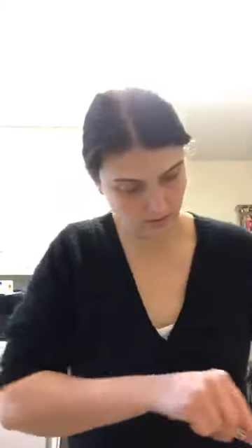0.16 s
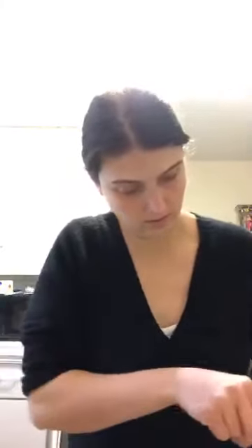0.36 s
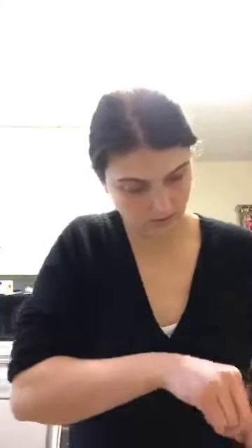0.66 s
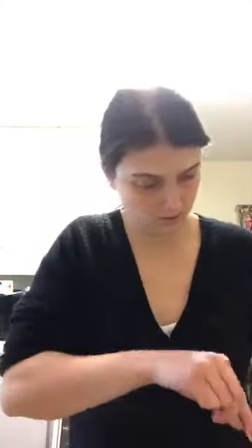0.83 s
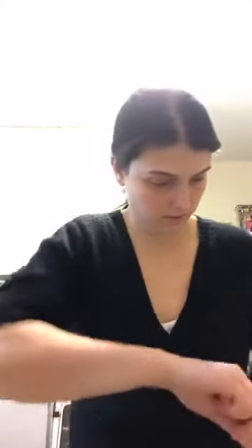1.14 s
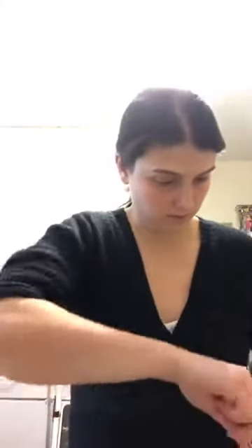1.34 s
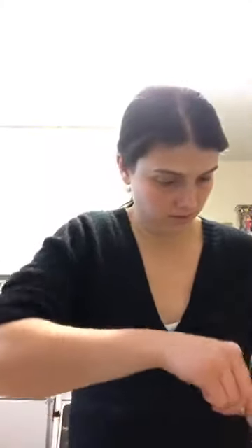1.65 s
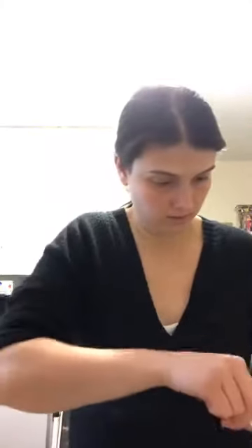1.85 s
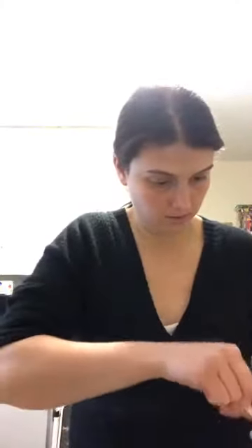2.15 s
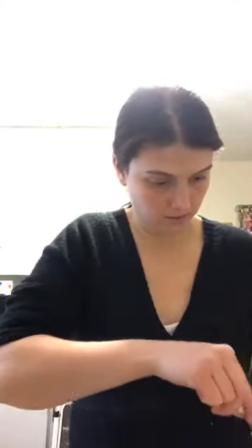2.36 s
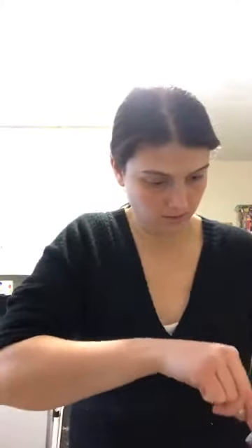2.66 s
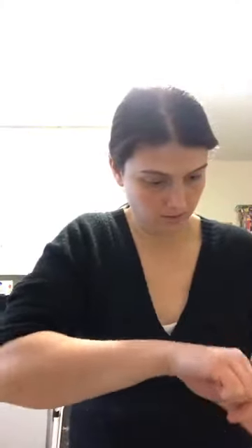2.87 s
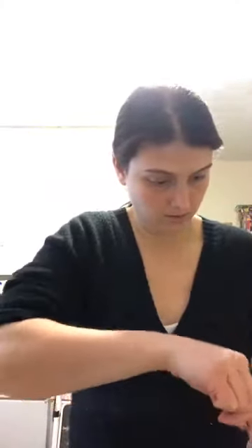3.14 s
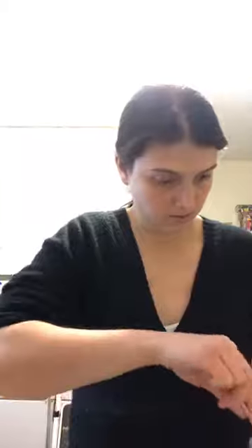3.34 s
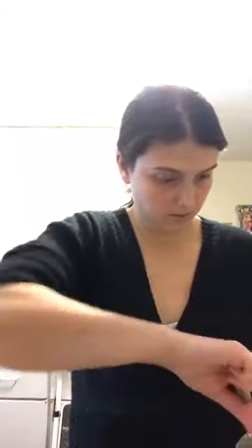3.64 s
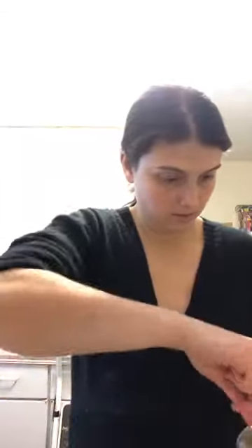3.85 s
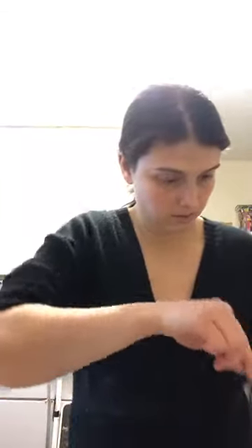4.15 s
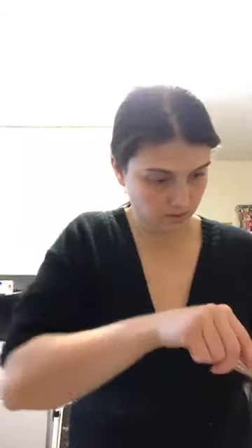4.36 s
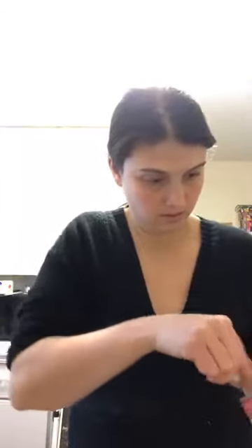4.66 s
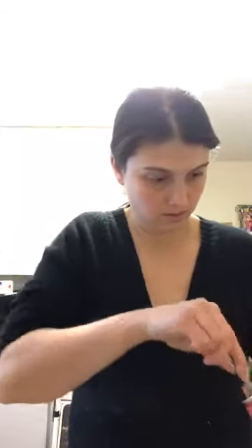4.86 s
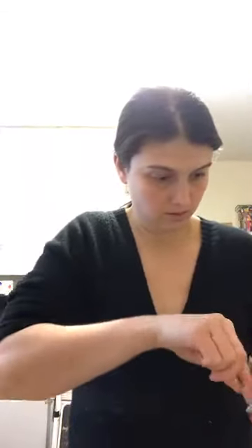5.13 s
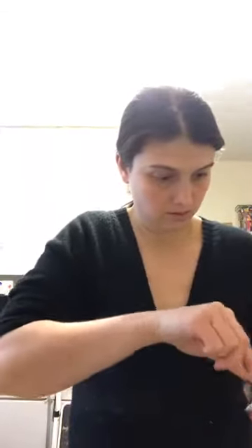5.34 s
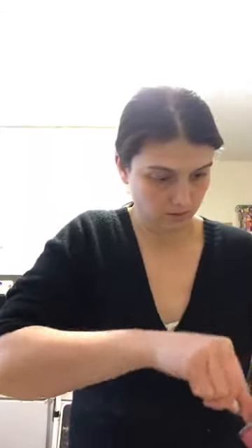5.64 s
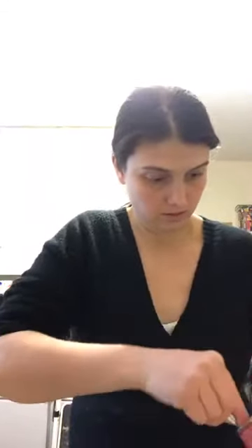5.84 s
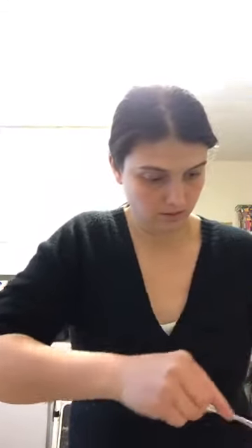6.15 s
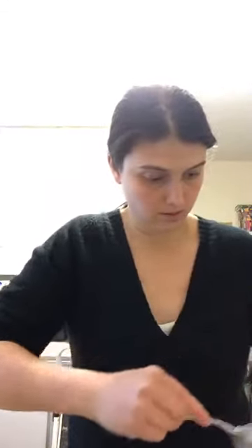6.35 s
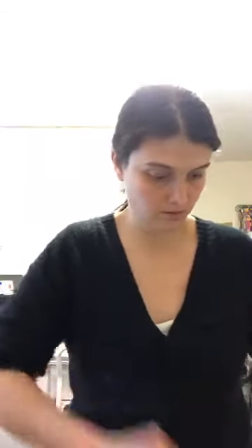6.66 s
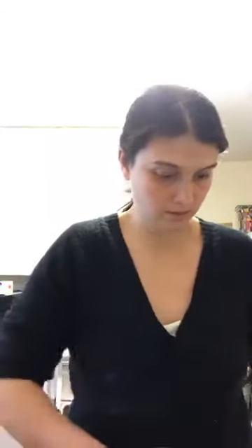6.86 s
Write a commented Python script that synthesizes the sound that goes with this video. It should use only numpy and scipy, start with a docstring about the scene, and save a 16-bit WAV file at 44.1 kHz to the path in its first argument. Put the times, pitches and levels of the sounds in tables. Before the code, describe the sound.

A metal spoon knocks and scrapes inside a tin can in short irregular bursts over faint kitchen hum, ending with a dull counter thud.

```python
"""In a small kitchen, a metal spoon works thick soup out of a tin can into a bowl.
Blows clink on the can wall: a chattering contact excites metal rings, and decaying sines give wall and hollow air.
Scrapes are stick-slip pulses and grit noise driving the resonances of can and spoon.
Mains hum and filtered room noise lie underneath; at the end something is set down on the counter with a thud.
Reflections and a short diffuse tail place the blows, scrapes and thud in the room."""
import sys
import numpy as np
from scipy import signal
from scipy.fft import rfft, irfft
from scipy.io import wavfile

SR = 44100
rng = np.random.default_rng(int(sys.argv[2]) if len(sys.argv) > 2 else 0)


def waveform_to_disk(signal):
    """Save audio, clipped to [-1, 1], as 16-bit WAV at the path in sys.argv[1]."""
    frames = np.transpose(np.atleast_2d(signal))
    scaled = np.clip(frames, -1, 1) * 32767
    samples = np.round(scaled).astype(np.int16)
    wavfile.write(sys.argv[1], SR, samples)


N = 308700  # 7 s

# thin ringing of the spoon: (frequency [Hz], t60 [s], level [dB])
SPOON_PARTIALS = [(5195, 0.033, -13), (5705, 0.052, -13.5), (6860, 0.022, -6), (7560, .04, -28),
                  (8780, 0.016, -1.5), (9140, 0.011, -3), (11400, .03, -16), (13800, 0.035, -13.5),
                  (14065, 0.17, -34)]
# pitch of the can wall when nothing presses it
WALL_REST_HZ = 1140


def undb(db):
    """Decibels to gain."""
    return 10 ** (np.asarray(db) / 20)


def unit(x, size=None):
    """Scale to rms 1 over the first samples, or over all."""
    return x / np.sqrt(np.mean(x[:size] ** 2) + 1e-20)


def fade(t, t60):
    """Exponential decay by 60 dB in t60 seconds."""
    return np.exp(-np.log(1000) * t / t60)


def add(out, s, x):
    """Mix a sound in at time s."""
    i = int(s * SR)
    out[i:i + len(x)] += x[:len(out) - i]


def wander(size, rate):
    """Random motion of spread near 1, with straight lines between `rate` random knots per second."""
    knots = np.arange(size) * rate / SR
    heights = rng.standard_normal(int(knots[-1]) + 2)
    return np.interp(knots, np.arange(len(heights)), heights)


def blend(places, position):
    """Levels between the neighbouring rows of a table, for a position from 0 to 1."""
    rows = np.linspace(0, 1, len(places))
    return [np.interp(position, rows, db) for db in np.transpose(places)]


def colour(x, points):
    """Causal minimum-phase filter with the given (frequency [Hz], level [dB]) curve."""
    hz, db = np.transpose(points)
    log_hz = np.log(np.fft.rfftfreq(4096, 1 / SR) + 1)
    gain = undb(np.interp(log_hz, np.log(hz), db))
    # folding the cepstrum onto positive time makes the response causal
    cepstrum = irfft(np.log(gain))
    cepstrum[1:len(gain) - 1] *= 2
    cepstrum[len(gain):] = 0
    response = irfft(np.exp(rfft(cepstrum)))
    return signal.fftconvolve(x, response)[:len(x)]


def mode(x, hz, width_hz):
    """A resonance driven by x; its frequency may move."""
    turn = np.exp(2j * np.pi * np.cumsum(hz * np.ones(len(x))) / SR)
    envelope = signal.lfilter([1], [1, -np.exp(-np.pi * width_hz / SR)], x / turn)
    return (turn * envelope).imag


def background():
    """An appliance hums, wavering a little, over soft room noise."""
    # mains hum, about which each level wavers: (frequency [Hz], level [dB])
    hum_partials = [(60, -64.5), (120, -56.5), (181, -58), (241, -64.5), (361, -66)]
    # colour of the room noise: (frequency [Hz], relative level [dB])
    room_curve = [(15, -56.5), (25, -29), (46, -8.5), (180, -3), (206, -14), (229, -8), (326, -16),
                  (363, -14.5), (439, -16.5), (677, -20.5), (734, -19), (988, -18.5), (1650, -29.5),
                  (2400, -29.5), (3100, -35), (4100, -35.5), (8140, -41), (16000, -48)]
    room_db = -53
    t = np.arange(N) / SR
    hum = np.zeros(N)
    for hz, db in hum_partials:
        level = undb(db + 2.3 * wander(N, 2.7))
        hum += level * unit(np.sin(2 * np.pi * hz * t + .5 * wander(N, 10)))
    room = unit(colour(rng.standard_normal(N), room_curve))
    return hum + undb(room_db + 0.29 * wander(N, 4.5)) * room


def kitchen(x):
    """Counter and cupboards reflect at once; a short diffuse tail follows, drawn anew for each sound."""
    # early reflections, each delay varied by up to 12 %: (delay [s], level [dB])
    echoes = [(.0022, -15.5), (.0055, -14), (.0205, -25.5), (.039, -30.5)]
    # diffuse reverberation: (band centre [Hz], level [dB], t60 [s])
    reverb_bands = [(180, -4, 0.47), (396, -3.5, 0.15), (724, -10.5, 0.33), (1290, -6, 0.18),
                    (2820, -10, 0.27), (5500, -10.5, 0.26), (11500, -12.5, 0.19)]
    t = np.arange(2 ** 14) / SR
    centres, db, t60 = np.transpose(reverb_bands)
    log_hz = np.log(np.fft.rfftfreq(len(t), 1 / SR) + 1)
    bands = np.array([np.interp(log_hz, np.log(centres), band) for band in np.eye(len(centres))])
    tails = fade(t, t60[:, None]) * np.clip((t - .004) / 0.0029, 0, 1)
    tails *= undb(db[:, None]) / np.linalg.norm(tails, axis=1, keepdims=True)
    noise = irfft(rfft(rng.standard_normal(len(t))) * bands)
    response = np.sum(noise * tails, axis=0)
    response[0] += 1  # direct sound
    for delay, echo_db in echoes:
        add(response, delay * rng.uniform(.88, 1.12), undb([echo_db]))
    return signal.fftconvolve(x, response)


def thud(lead_s=0.00347):
    """An edge touches the counter first, then the full weight lands and its modes ring."""
    # modes of the counter: (frequency [Hz], t60 [s], relative level [dB])
    counter_modes = [(115, 0.15, -9.5), (152, 0.071, -3), (260, 0.12, -5.5), (375, 0.03, -9),
                     (470, 0.022, 7), (710, 0.055, -6.5), (1006, 0.032, -1), (1290, 0.044, -8.5)]
    # colour of the touch on the counter: (frequency [Hz], relative level [dB])
    touch_curve = [(200, -20), (600, 3), (1200, -10), (1800, -4), (2700, -2.5), (4200, -5), (7000, -18),
                   (15000, -29)]
    thud_s, body_db, touch_db = 6.9595, -12, -26
    t = np.arange(SR // 4) / SR
    noise = rng.standard_normal(len(t)) * fade(t, 0.0091) * (1 - np.exp(-t / 0.0026))
    touch = colour(noise, touch_curve)
    # neighbouring modes start with opposite sign
    body = sum((-1) ** k * undb(db) * fade(t, t60) * np.sin(2 * np.pi * hz * t)
               for k, (hz, t60, db) in enumerate(counter_modes))
    out = np.zeros(N)
    add(out, thud_s - lead_s, undb(touch_db) * unit(touch, size=530))
    add(out, thud_s, undb(body_db) * body * (1 - np.exp(-t / 0.00093)))
    return out


def can_ring(force, ring_hz, others_db=0, bend=1, scatter_db=2.0, detune=0.023, lead_width_hz=95, low_hz=1500):
    """The can's upper modes; the place of contact favours one of them, and the moving spoon bends them all."""
    # upper modes, damped by soup and hand, before scatter: (frequency [Hz], width [Hz], relative level [dB])
    can_modes = [(2055, 35, -7.5), (2300, 120, -23), (2610, 62, -4), (2756, 110, -10.5), (3125, 86, -5),
                 (3855, 300, 0.5), (4180, 120, -6.5), (4420, 240, -7.5)]
    others = np.zeros(len(force))
    for hz, width_hz, db in can_modes:
        level_chance, pitch_chance = rng.standard_normal(2)
        gain = undb(db + scatter_db * level_chance) * np.sqrt(width_hz)
        others += gain * mode(force, hz * bend * (1 + detune * pitch_chance), width_hz)
    favoured = unit(mode(force, ring_hz * bend, lead_width_hz))
    ring = undb(others_db) * unit(others) + favoured
    # a small tin radiates little below these modes
    return signal.sosfilt(signal.butter(2, low_hz, "high", fs=SR, output="sos"), ring)


def spoon_ring(t, scatter_db=3, detune=0.016):
    """High partials of the spoon, mixed anew by every blow and shifted a little by the soup it carries."""
    ring = np.zeros(len(t))
    for hz, t60, db in SPOON_PARTIALS:
        level_chance, pitch_chance, phase = rng.standard_normal(3)
        tone = np.sin(2 * np.pi * (hz * (1 + detune * pitch_chance) * t + phase))
        ring += undb(db + scatter_db * level_chance) * fade(t, t60) * tone
    return ring


def choke(t, hold_s, free=0.11, free_t60=0.031):
    """The spoon presses home and smothers a ring; a small share rings on."""
    return np.exp(-(t / hold_s) ** 2) + free * fade(t, free_t60)


def scrape(start, peak, end, soup, wall_hz, ring_hz,
           swell_db=17, jitter=.035, squeal=0.41, grit_db=4.0, catch_rate=70, catch_size=0.94):
    """The spoon's edge sticks and slips along the wall, partly locked to the wall mode."""
    # colour of metal sliding on wet metal: (frequency [Hz], relative level [dB])
    friction_curve = [(200, -30), (450, -12), (750, 11.5), (1700, 1), (4300, 2), (5000, 3.5), (6700, 3.5),
                      (9300, -6), (10100, -1.5), (13000, -6), (15700, -20)]
    # levels in even steps from bare tin to buried in soup: (can air [dB], can wall [dB],
    # metal ring [dB], hiss [dB], other rings against the favoured one [dB])
    soup_levels = [(-19, -12, -5, -3.5, 0), (-10, -4.5, -3.5, -11.5, -4), (-5.5, -6, -20, -19, 9.5),
                   (-2.5, -26, -15, -33.5, -14.5)]
    air_hz = 763
    # pressing stiffens the wall: the pitch lift grows with the wall's pitch above rest
    least_lift, lift_per_stretch = .02, .75
    # the contact slides along the spoon, so a ripple in the spectrum sinks; its spacing is for the peak
    ripple_hz, ripple_octaves_per_s, ripple_share = 683, -4, 0.82
    # on bare tin the can's rings sink as the spoon slides down; soup holds them steady
    ring_octaves_per_s = -2.5

    air_db, wall_db, ring_db, hiss_db, others_db = blend(soup_levels, soup)
    lift = least_lift + lift_per_stretch * max(wall_hz / WALL_REST_HZ - 1, 0)
    t = np.arange(start, end + 0.051, 1 / SR)
    swell = np.interp(t, [start, peak, end], [-swell_db, 0, -swell_db])
    pressure = undb(swell + 2.1 * wander(len(t), 127))
    pressure *= np.clip((t - start) / 0.02, 0, 1) * np.clip(1 + (end - t) / 0.0033, 0, 1)
    # a hard stroke lifts the resonances and lets them sink as the spoon leaves
    bend = np.exp(lift * (np.exp(-((t - peak + 0.013) / .026) ** 2) - .8))
    hz = wall_hz * bend
    # one slip per jittered cycle of the wall
    cycles = np.cumsum(hz * (1 + jitter * wander(len(t), 900))) / SR
    slips = np.diff(np.floor(cycles), prepend=0) * undb(8.5 * wander(len(t), 1400))
    grit = rng.standard_normal(len(t)) * undb(grit_db * wander(len(t), 1400))
    # now and then (catch_rate per second) the edge catches on the tin and jumps free
    jumps = rng.random(len(t)) < catch_rate / SR
    catches = signal.lfilter([1], [1, -np.exp(-1 / (0.0028 * SR))], jumps)
    force = (squeal * unit(slips - slips.mean()) + unit(grit)) * (1 + catch_size * catches)
    air = mode(mode(force, air_hz, 101), air_hz, 133)
    wall = mode(mode(force, hz, 50), hz, 500)
    # each slip returns from the spoon's tip, later as the contact slides away
    lag = 1 / (ripple_hz * 2 ** (ripple_octaves_per_s * (t - peak)))
    force = force + ripple_share * np.interp(t - lag, t, force)
    slide = 2 ** (ring_octaves_per_s * (1 - soup) ** 2 * (t - peak))
    ring = can_ring(force, ring_hz, others_db, bend * slide, lead_width_hz=23)
    # the spoon's own partials colour the hiss
    partials = sum(undb(db) * mode(force, f * bend, 170) for f, _, db in SPOON_PARTIALS)
    hiss = unit(colour(force, friction_curve)) + undb(-12) * unit(partials)
    parts = [(air, air_db), (wall, wall_db), (ring, ring_db), (hiss, hiss_db)]
    return pressure * sum(undb(db) * unit(x) for x, db in parts)


def blow(strength_db, depth, air_hz, wall_hz, ring_hz, bottom_hz=470):
    """The spoon chatters for a few milliseconds; the wall rings at once and the air in the can swells behind it."""
    # colour of metal striking metal: (frequency [Hz], relative level [dB])
    contact_curve = [(90, -30), (220, 4.5), (340, -3.5), (480, -11), (1000, 12.5), (1700, -10), (4400, 0),
                     (5000, 3), (6700, 0.5), (9500, -1), (10100, -5), (13000, -6), (15700, -14)]
    # levels in even steps from rim to bottom; bright ticks give way to the wall, then to the hollow air:
    # (can air [dB], can wall [dB], metal ring [dB], tick [dB], can bottom before stretch [dB],
    # other rings against the favoured one [dB])
    depth_levels = [(-4.5, -11, 0, 1, -10, 5.5), (-3, -5, -2, -4.5, -18, -4), (-3.5, 4, -4.5, -7, -26, 7.5),
                    (0.5, -10, -9, -10.5, -23.5, -1), (0.5, -9, -18.5, -25.5, -24.5, -1)]
    # the air in the open can hums on after a blow; this level is for a firm one
    open_air_hz, open_air_t60_s, open_air_db = 721.5, .33, -29
    # a light touch low in the can leaves more of that hum: dB gained per dB below a firm blow
    firm_blow_db, hum_db_per_db = -20, 1.2
    # a stretched wall passes less of a blow on to the bottom: dB per unit of stretch
    bottom_db_per_stretch = -59

    air_db, wall_db, ring_db, tick_db, bottom_db, others_db = blend(depth_levels, depth)
    t = np.arange(SR // 4) / SR
    onset = 1 - np.exp(-t / 0.0022)
    chatter = rng.standard_normal(len(t)) * undb(4.5 * wander(len(t), 1346)) * onset
    # the air column is fed through the wall, so it takes a few cycles to build up
    air = (1 - np.exp(-t / 0.0031)) ** 2 * choke(t, 0.007) * np.sin(2 * np.pi * air_hz * t)
    hum_db = open_air_db + hum_db_per_db * depth * max(firm_blow_db - strength_db, 0)
    open_air = (1 - np.exp(-t / 0.016)) * fade(t, open_air_t60_s) * np.sin(2 * np.pi * open_air_hz * t)
    air += undb(hum_db) * open_air
    wall = (1 - np.exp(-t / 0.00072)) * choke(t, 0.011) * np.sin(2 * np.pi * wall_hz * t)
    # the soup-laden bottom gives only a short, dull bump
    bottom_db += bottom_db_per_stretch * max(wall_hz / WALL_REST_HZ - 1, 0)
    bottom = t ** 2 * fade(t, 0.016) * np.sin(2 * np.pi * bottom_hz * t)
    ring = can_ring(chatter * fade(t, 0.014), ring_hz, others_db, lead_width_hz=100)
    contact = unit(colour(chatter * fade(t, 0.017), contact_curve), size=530)
    tick = contact + undb(4.5) * onset * spoon_ring(t)
    parts = [(air, air_db), (wall, wall_db), (bottom, bottom_db), (ring, ring_db), (tick, tick_db)]
    # levels are set over the first 12 ms
    return sum(undb(db) * unit(x, size=530) for x, db in parts)


def scene():
    """Blows, scrapes and the thud sound in the kitchen."""
    # spoon blows: (time [s], strength [dB], depth in the can [0 rim to 1 bottom],
    # air [Hz], wall [Hz], favoured ring [Hz])
    blows = [(.078, -44, 0, 780, 1100, 4450), (0.2424, -22, .27, 806, 1170, 2710),
             (0.347, -33, 0.29, 790, 1060, 2730), (0.3678, -15, 0.76, 753, 1038, 2580),
             (.3872, -22.5, 1, 857, 1056, 2460), (0.5976, -47, 0, 715, 1060, 1930),
             (0.9042, -23.5, 0.27, 750, 1046, 2585), (1, -26, 0.24, 828, 1090, 2680),
             (1.085, -30, 0.11, 860, 1040, 4040), (1.1143, -16, 0.77, 809, 1054, 2470),
             (1.2578, -29.5, 1, 750, 1030, 2180), (1.2719, -12.5, 0.9, 770, 1054, 2100),
             (1.7187, -20.5, 0.26, 735, 1030, 2370), (1.7843, -33.5, 0.39, 783, 1073, 2630),
             (1.8716, -24, 0.4, 698, 1072, 4380), (1.8884, -32, 0.12, 713, 1060, 2070),
             (2.05, -39, 0.37, 740, 1000, 4090), (2.1107, -22, 0.57, 780, 1138, 2825),
             (2.2289, -34.5, 0.011, 783, 1060, 1940), (2.3742, -36, 0, 700, 1040, 3450),
             (2.4174, -24.5, 0.36, 783, 1410, 2540), (2.4841, -24, 0.33, 745, 1113, 2670),
             (2.7176, -41.5, 0, 770, 1400, 2570), (2.7275, -29, 0.4, 768, 1323, 2720),
             (2.854, -26, 0.31, 780, 1167, 2250), (2.8778, -12, 0.83, 760, 1143, 2610),
             (2.9188, -20.5, 0.98, 797, 1075, 2610), (3.134, -39, 0.019, 726, 1104, 3030),
             (3.399, -52.5, 0, 855, 1060, 2220), (3.414, -31, 0.34, 825, 1147, 2220),
             (3.4778, -36, 0.64, 773, 1100, 2120), (3.53, -14, .86, 782, 1086, 2590),
             (3.5622, -15, 0.93, 762, 1072, 2130), (3.9835, -42.5, 0.0066, 710, 1420, 3000),
             (4.1065, -42.5, 0.13, 730, 1044, 4300), (4.3, -25.5, 0.3, 773, 1233, 2610),
             (4.44, -27, 0.31, 834, 1095, 2710), (4.458, -11, 0.89, 749, 1065, 2620),
             (4.4803, -21, 0.88, 736, 1094, 2050), (4.689, -56.5, 0, 766, 1086, 4270),
             (4.8525, -33, 0.0092, 695, 1050, 4410), (4.906, -18, 0.6, 830, 1157, 2780),
             (5.0856, -21.5, 0.53, 693, 1100, 2780), (5.1082, -21, 0.83, 756, 980, 2760),
             (5.301, -36, 0, 750, 1140, 1900), (5.343, -22.5, 0.38, 760, 1286, 2820),
             (5.4298, -25, 0.33, 697, 1090, 2070), (5.4521, -18, 0.84, 826, 1127, 2850),
             (5.7069, -17, 0.91, 835, 1110, 2010), (6.102, -46, 0.81, 683, 1094, 3100),
             (6.149, -49.5, 0.5, 718, 1100, 3920), (6.166, -47.5, 0.69, 690, 1110, 3900),
             (6.256, -30.5, 0.74, 718, 1120, 3950), (6.635, -62, 0, 820, 1290, 1850)]
    # scrapes: (start [s], peak [s], end [s], strength [dB],
    # soup under the spoon [0 bare tin to 1 buried], wall before bending [Hz], favoured ring before bending [Hz])
    scrapes = [(0.079, 0.125, .18, -43, 0.27, 1035, 2900), (0.297, 0.365, .368, -32.5, .22, 1147, 2635),
               (0.607, 0.623, .66, -47, 0.34, 1094, 2520), (1.005, 1.037, 1.09, -29.5, 0.31, 1125, 2675),
               (1.341, 1.394, 1.415, -47, 0.18, 1055, 2370), (1.468, 1.505, 1.56, -45, 0.51, 1064, 2024),
               (1.801, 1.856, 1.9, -28, 0.0085, 1341, 2470), (2.132, 2.208, 2.23, -28.5, 0.18, 1300, 2530),
               (2.431, 2.476, 2.495, -26, 0.34, 1314, 2524), (2.798, 2.851, 2.875, -35, .5, 1280, 2590),
               (3.032, 3.066, 3.11, -47.5, 0.19, 1155, 2040), (3.498, 3.52, 3.56, -39, .33, 1130, 2057),
               (3.688, 3.817, 3.85, -32, 1, 1046, 2040), (3.797, 3.885, 3.91, -34.5, 0.78, 1113, 2000),
               (4.39, 4.431, 4.465, -30, 0.44, 1140, 2820), (5.018, 5.062, 5.11, -27, 0.099, 1248, 2450),
               (5.34, 5.417, 5.45, -29, 0.37, 1294, 2700), (5.532, 5.593, 5.68, -39, 0.735, 1160, 1870),
               (5.681, 5.7, 5.715, -21, 0.66, 1127, 2800), (5.833, 5.877, 5.92, -42, 0.6, 1142, 3260),
               (5.894, 5.913, 6.04, -29.5, 0.62, 1095, 2870), (6.043, 6.147, 6.2, -42, 0.57, 1096, 2670),
               (6.191, 6.189, 6.26, -29.5, 0.56, 1113, 2780), (6.752, 6.811, 6.88, -62.5, 0, 1140, 1860)]
    out = background() + kitchen(thud())[:N]
    for s, db, *contact in blows:
        add(out, s, undb(db) * kitchen(blow(db, *contact)))
    for start, peak, end, db, *contact in scrapes:
        add(out, start, undb(db) * kitchen(scrape(start, peak, end, *contact)))
    return out[None]


def record(dry):
    """The phone's microphone drops the deep bass and cuts the top."""
    bass_hz, top_hz = 44, 15900
    thin = signal.sosfilt(signal.butter(3, bass_hz, "high", fs=SR, output="sos"), dry)
    return signal.sosfilt(signal.ellip(8, .2, 70, top_hz, fs=SR, output="sos"), thin)


dry = scene()
out = record(dry)
waveform_to_disk(out)
```